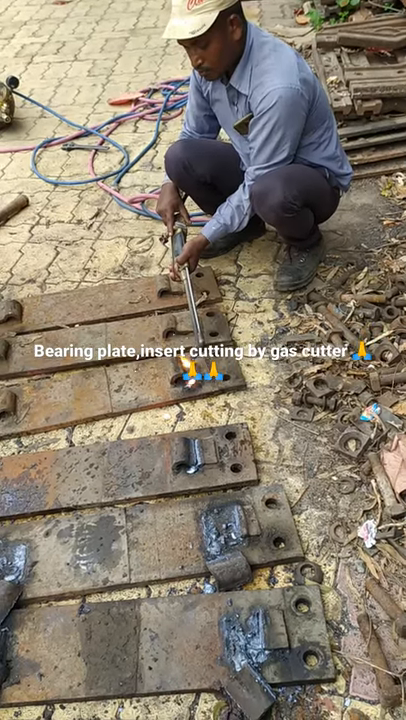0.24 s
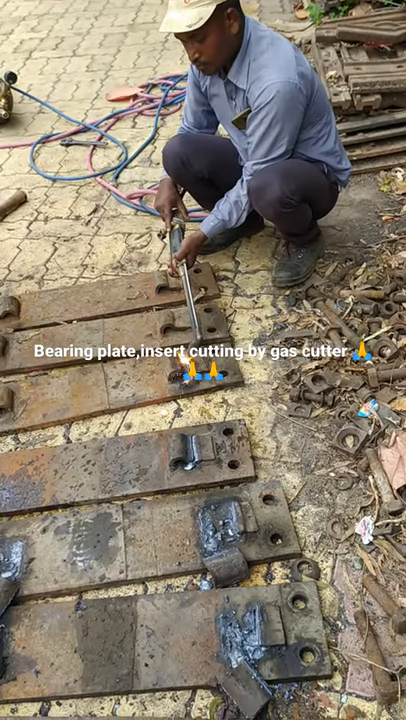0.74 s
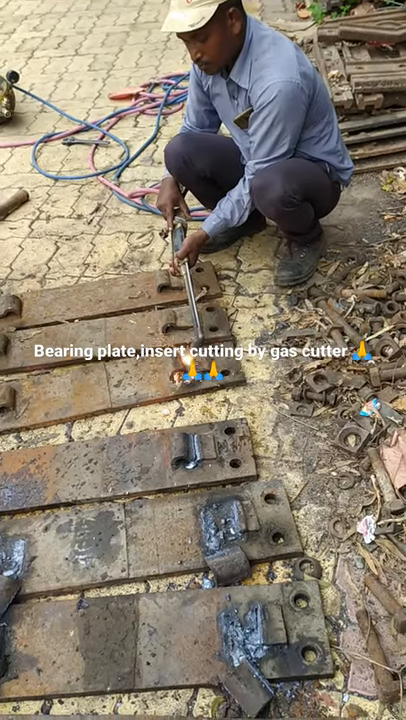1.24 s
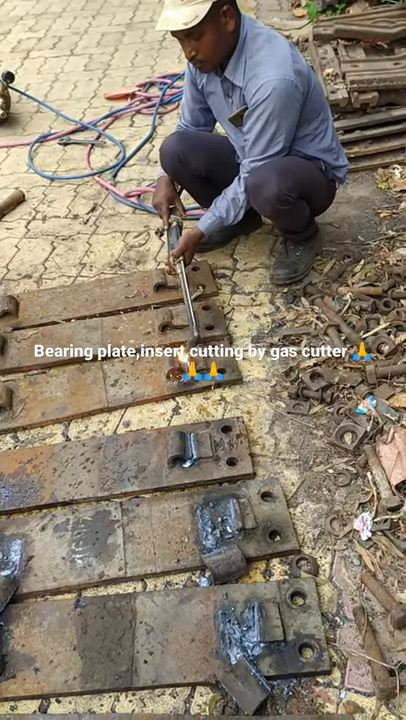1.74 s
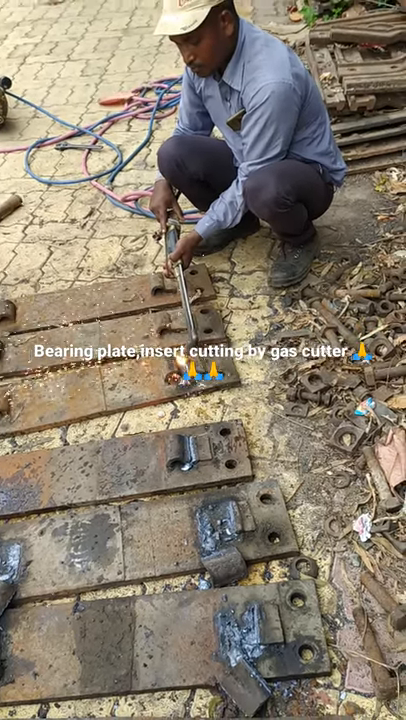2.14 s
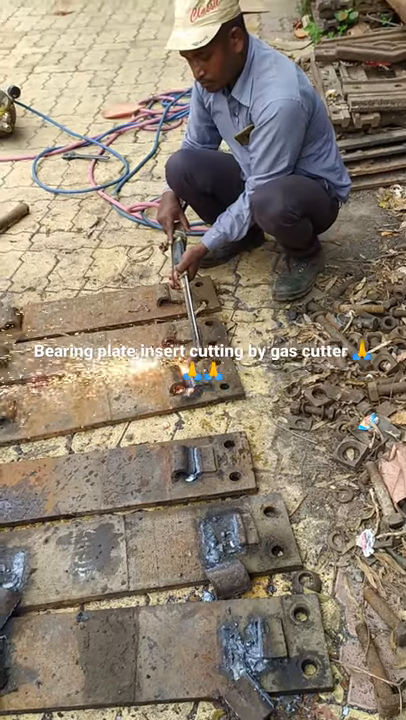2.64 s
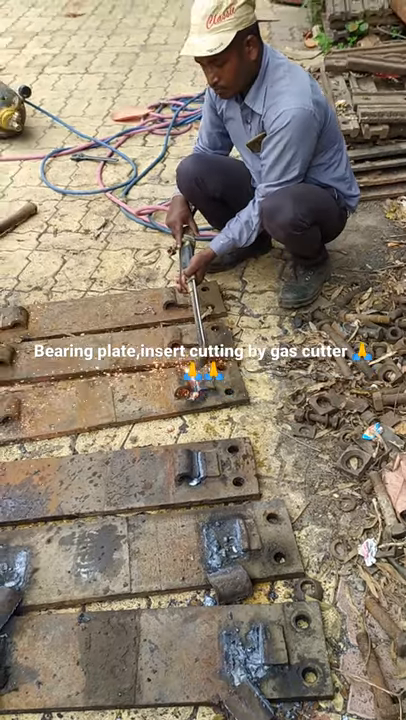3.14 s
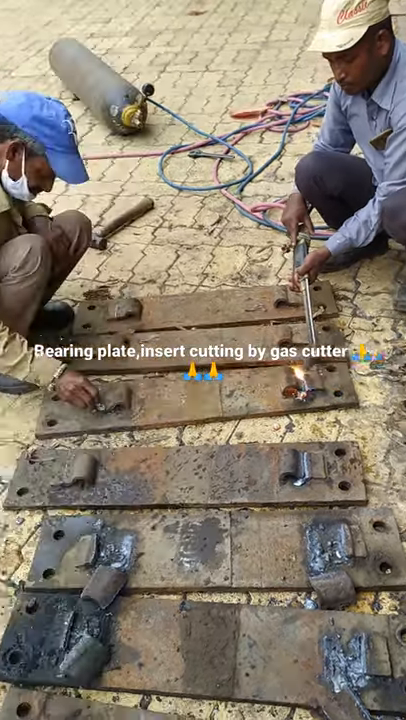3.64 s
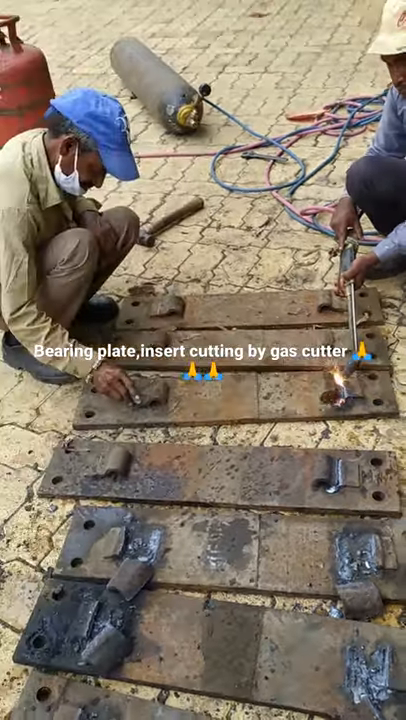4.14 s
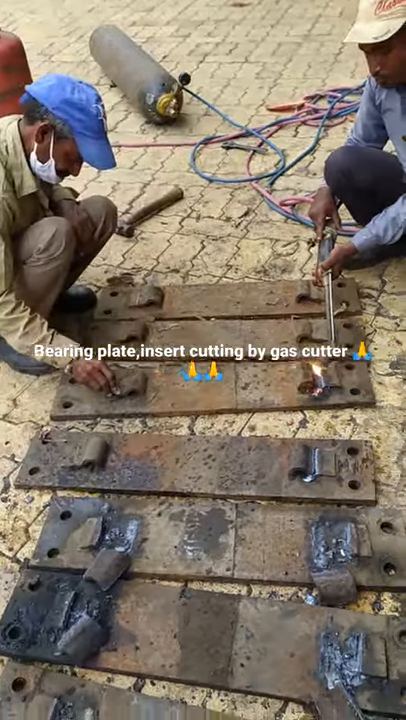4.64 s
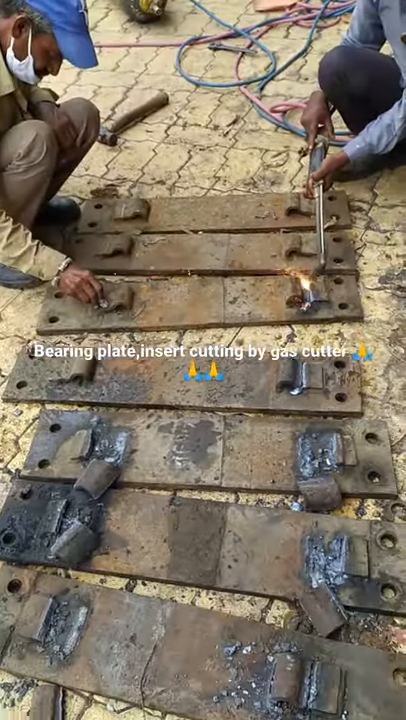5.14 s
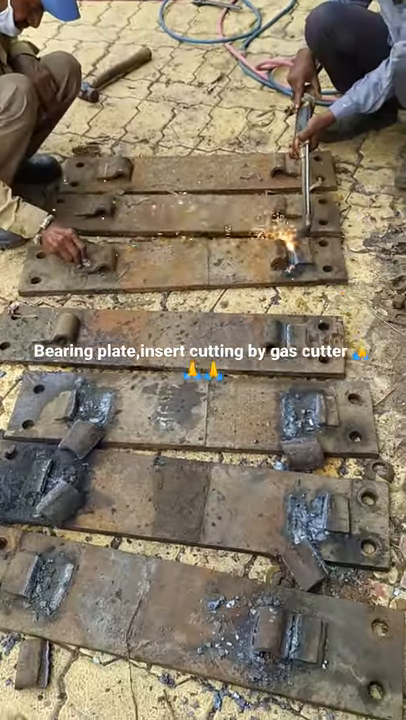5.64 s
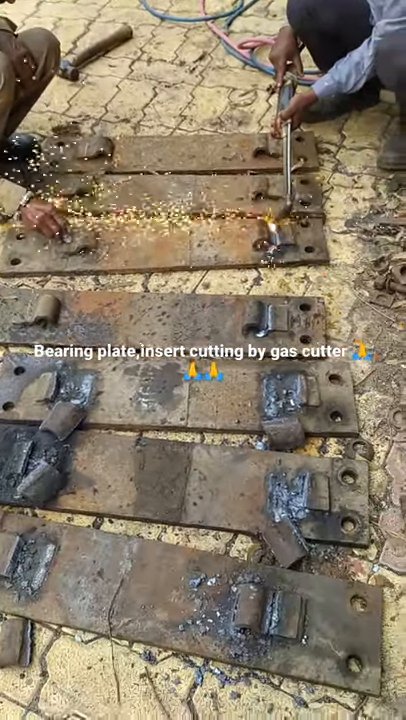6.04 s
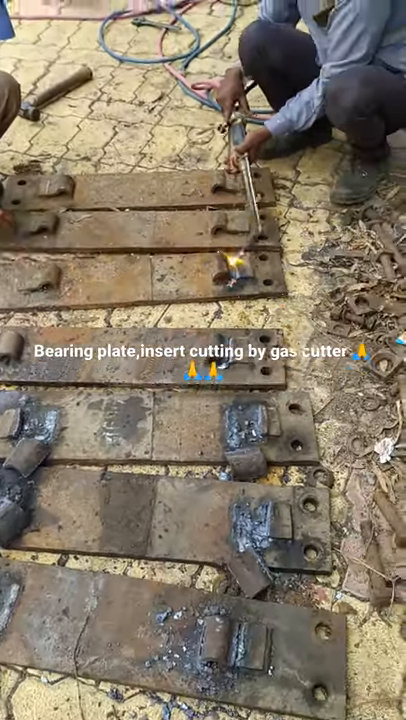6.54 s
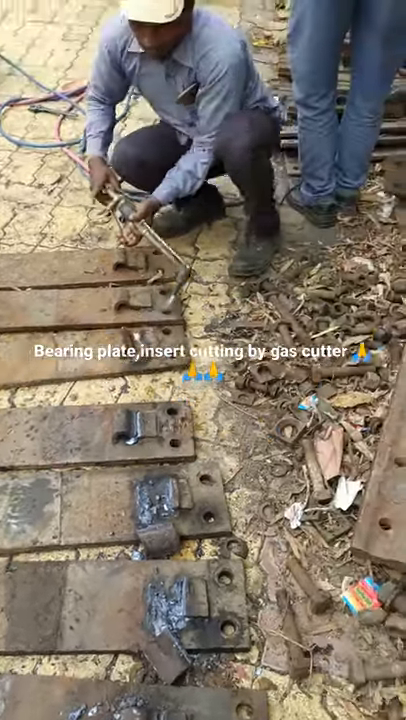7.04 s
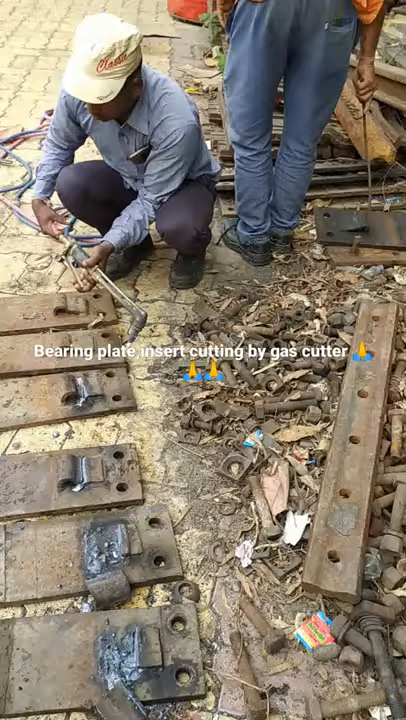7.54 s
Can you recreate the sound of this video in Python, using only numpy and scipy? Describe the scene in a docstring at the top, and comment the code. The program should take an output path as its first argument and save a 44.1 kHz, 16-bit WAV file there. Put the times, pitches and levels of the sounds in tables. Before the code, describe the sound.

A gas cutting torch hisses loudly and steadily over steel plate outdoors, metal clinks once, then the flame pops and sputters as it lifts off.

```python
"""Paving outdoors, where a gas torch cuts a steel plate, heard close by a hand-held pair of microphone ports.
The jet hisses and sizzles in flickering bands of noise, and sets a narrow resonance of the left port ringing.
The flame roars in lower bands, pops in short noise bursts and, lifted off, sputters in a quickening train.
Oxygen rushes out, then drones as noise through the resonances of the slot it blows through. Someone knocks a
piece of steel (ringing modes) and a breeze pushes on the ports (low noise and slow thuds)."""
import sys
import numpy as np
from scipy import signal
from scipy.io import wavfile
from scipy.ndimage import map_coordinates

SR = 44100
rng = np.random.default_rng(int(sys.argv[2]) if len(sys.argv) > 2 else 0)


def store_wav(level_fs):
    """Save 16-bit WAV to argv[1]."""
    pcm = np.round(np.clip(np.atleast_2d(level_fs), -1, 1) * 32767)
    wavfile.write(sys.argv[1], SR, pcm.T.astype(np.int16))


def convert_level_to_amplitude(level_db):
    """Map a level in decibels to its linear amplitude factor."""
    exponent = np.asarray(level_db, float) / 20
    return 10 ** exponent


N = 343980

# lower edge of the treble that the steel echoes and that loses likeness as the hand turns
ECHO_LOW_HZ = 4200


def jet(hiss_db, flutter, focus):
    """Fast gas tears into eddies: broad hiss, a finer sizzle on top, and a narrow ring of the left port that
    the jet excites."""
    # colour of the jet: (time [s], left over right [dB], sizzle over hiss [dB], change of the hiss under 7 kHz
    # [dB], left port's ring over hiss [dB])
    aim = [(0.0, 4, -17, -5, -17), (1.1, 2.5, -8, -0.5, -5.5), (1.5, 4, -13.5, 1, -4.5),
           (2.87, 3, -7.5, 4, -8), (3.45, 2.5, -15, 0, -8), (4.45, 3, -10.5, 0, -9.5),
           (5.52, 4, -24, -8, -26), (6.06, 3.5, -13, -4, -11.5), (6.97, -0.5, -3, 5, -3),
           (7.5, 10, -16, 2.5, -11), (7.8, 7, -10, 7, 0)]
    # relative density of the hiss: (frequency [Hz], level [dB])
    hiss_colour = [(2500, 1), (4000, -4), (5500, -2.5), (6200, -0.5), (8000, 1.5), (10000, -2.5),
                   (11500, -1), (12500, -12)]
    # relative density of the sizzle: (frequency [Hz], level [dB])
    sizzle_colour = [(9000, -29), (10500, 8), (11600, 1), (12300, 3), (14000, -2), (15600, 8), (17000, -8)]
    ring_hz, ring_width_hz, ring_pan_db = 9080, 1100, 16

    pan_db, sizzle_db, breathy_db, ring_db = in_time(aim)
    hiss = ports(turbulence(hiss_colour, 0.43 * flutter, focus, patchy_db=1.16, grain_db=2.5))
    sizzle = ports(turbulence(sizzle_colour, 0.84 * flutter, focus, patchy_db=2.0, grain_db=5.5))
    # the ring of the left port: noise through it partly alike on both ports, plus some of each port's own
    own = np.array([blown(ring_hz, ring_width_hz) for side in "LR"])
    ring = blown(ring_hz, ring_width_hz) + own
    out = tilt(placed(hiss, hiss_db, pan_db), 7000, breathy_db)
    out = out + placed(sizzle, hiss_db + sizzle_db, pan_db)
    return out + placed(ring, hiss_db + ring_db, ring_pan_db)


def roar(roar_db, flutter, focus, begun):
    """Burning eddies rumble, coloured by the gaps between the plates until the torch is lifted off."""
    # relative density of the roar: (frequency [Hz], level [dB])
    roar_colour = [(60, -83), (150, -7), (300, -2.5), (700, 1), (1300, -8), (2000, -1), (3200, -8.5),
                   (4500, 0), (6000, -12), (9000, -9.5)]
    # gaps between the plates: (frequency [Hz], width [Hz], gain [dB])
    on_plate = [(607, 74, -6.5), (942, 160, 6), (1393, 330, 7.5), (2604, 740, 7)]
    # the same with the torch off the plate: (frequency [Hz], width [Hz], gain [dB])
    off_plate = [(670, 175, -13), (1003, 96, 10.5), (1370, 235, 15), (2200, 720, 7.5)]
    # start and end of the lifting: (time [s])
    lift_s = [6.87, 7.38]
    pan_db, dull_idle_db, dull_cut_db = -0.7, -2.5, 2.5

    eddies = turbulence(roar_colour, 0.65 * flutter, focus, patchy_db=0.9, grain_db=4.5)
    lifted = np.interp(np.arange(N) / SR, lift_s, [0, 1])
    out = (1 - lifted) * peaks(eddies, on_plate) + lifted * peaks(eddies, off_plate)
    # fuller under 1.2 kHz once the cut has begun
    dull_db = dull_idle_db + (dull_cut_db - dull_idle_db) * begun
    return tilt(placed(out, roar_db, pan_db), 1190, dull_db)


def pop_rows():
    """Loud pops, the sputter train and stray spits of slag as (time [s], bright level [dB], dull level [dB])."""
    # single loud pops of the flame: (time [s], bright level [dB], dull level [dB])
    loud_pops = [(4.95, -14, -20), (4.992, -13, -20), (5.051, -13, -20), (5.067, -12, -20),
                 (5.084, -12, -20), (5.121, -12, -19), (5.442, -13, -13), (5.4685, -11, -13),
                 (5.982, -14, -21), (6.016, -15, -21), (6.104, -14, -20), (6.193, -15, -21),
                 (6.236, -15, -21), (6.266, -16, -21), (6.32, -16, -19), (6.6096, -14, -5),
                 (6.7075, -12, -19), (6.762, -11, -18), (6.889, -12, -18), (6.9072, -16, -12),
                 (6.972, -14, -19), (7.025, -14, -12), (7.0708, -14, -21), (7.1354, -12, -7),
                 (7.5325, -15, -6), (7.5728, -8, -6), (7.647, -15, -12), (7.692, -18, -11),
                 (7.777, -18, -13)]
    # strength of the sputter: (time [s], bright level [dB], dull level [dB])
    sputter = [(6.63, -19, -22), (6.68, -12, -22), (6.74, -15, -21), (6.85, -20, -19), (7.08, -20, -20)]
    start_s, gap_s, haste_s, count = 6.6324, .0190, .00006, 26
    crackles_per_s, crackle_db, crackle_dull_db = 20, -21, -27

    k = np.arange(count)
    s = start_s + gap_s * k - haste_s * k ** 2  # the gaps shrink
    curve_s, bright_db, dull_db = np.transpose(sputter)
    train = np.c_[s, np.interp(s, curve_s, bright_db), np.interp(s, curve_s, dull_db)]
    chance = rng.random((300, 2))
    when = np.cumsum(-np.log(chance[:, 0])) / crackles_per_s
    # a few crackles are much louder than most, up to a ceiling
    level_db = [crackle_db, crackle_dull_db] - 3.5 * (1 + np.log(chance[:, 1:]))
    stray = np.c_[when, np.minimum(level_db, -16)]
    return np.r_[np.array(loud_pops), train, stray[when < N / SR - .01]]


def pops(bright_s, dull_s, crack):
    """Each pop is a crack and a puff of noise that dies in a few ms, with a bright and a dull part."""
    rows, out = pop_rows(), 0
    at = np.round(rows[:, 0] * SR).astype(int)
    # noise common to both ports, plus some of each port's own
    noise = rng.standard_normal(N) + .5 * rng.standard_normal((2, N))
    for column, low_hz, high_hz, fall_s in ((1, 5900, 10200, bright_s), (2, 900, 4900, dull_s)):
        starts = np.full(N, 1e-18)
        starts[at] = convert_level_to_amplitude(rows[:, column])
        puff = noise * signal.lfilter([1], [1, -np.exp(-1 / (fall_s * SR))], starts)
        band = signal.butter(2, [low_hz, high_hz], "band", fs=SR, output="sos")
        out = out + signal.sosfilt(band, puff + crack * starts)
    return ports(out)


def rush_level():
    """Each press of the oxygen lever starts weak, swells, holds and is shut off fast; level in dB."""
    # presses of the lever: (time [s], length [s], level [dB])
    presses = [(0.981, 0.023, -22), (1.1, 0.14, -13.5)]
    swell_share, start_db, release_s = .4, -12, .006

    t, out = np.arange(N) / SR, np.full(N, 1e-4)
    for s, length_s, db in presses:
        swell_db = start_db * np.clip(1 - ((t - s) / (swell_share * length_s)) ** 2, 0, 1)
        shut = np.exp(-np.maximum(t - s - length_s, 0) / release_s)
        out += (t > s) * convert_level_to_amplitude(db + swell_db) * shut
    return 20 * np.log10(out)


def blast(flutter, focus):
    """The lever lets a rough, dull rush of oxygen through."""
    # relative density of the rush: (frequency [Hz], level [dB])
    blast_colour = [(120, -14.5), (250, 0), (600, -1), (1200, 1.5), (2400, -0.5), (3000, 9), (3500, -12)]
    rush = turbulence(blast_colour, flutter, focus, patchy_db=1.5, grain_db=6.5)
    return placed(rush * convert_level_to_amplitude(3.0 * drift(90)), rush_level(), -1.0)


def cut_progress():
    """The oxygen blows through the slot: a 0-1 rise that stays, and the same dying away at the end."""
    start_s, end_s, fade_in_s, fade_out_s = 0.96, 6.44, 0.5, 0.2
    t = np.arange(N) / SR
    begun = np.clip((t - start_s) / fade_in_s, 0, 1)
    return begun, begun * np.exp(-np.maximum(t - end_s, 0) / fade_out_s)


def drone(cutting):
    """The oxygen stream blows the slot like a bottle."""
    # air in the slot: (frequency [Hz], width [Hz], relative level [dB])
    slot = [(385.2, 60.7, -3), (967, 115, -10)]
    cut_db, idle_db, waver_db = -29.5, -44.5, 1.0
    level_db = idle_db + (cut_db - idle_db) * cutting + waver_db * drift(0.71)
    out = sum(convert_level_to_amplitude(db) * blown(hz, width_hz) for hz, width_hz, db in slot)
    return convert_level_to_amplitude(level_db) * out * convert_level_to_amplitude(np.array([[1.2], [-1.2]]))  # left, right


def knocks():
    """A struck piece of steel rings in dying modes; each knock strikes every mode with its own strength."""
    # the knocks: (time [s], level [dB])
    strikes = [(3.758, -23), (3.763, -18), (3.7668, -19), (3.770, -13), (3.79, -23), (3.813, -18.5),
               (3.827, -19), (3.841, -18), (3.86, -22), (3.880, -19), (3.887, -19), (3.898, -20.5),
               (3.914, -28)]
    # modes of the steel: (frequency [Hz], relative level [dB], time to fall by 60 dB [s])
    steel = [(298, -3, 0.04), (520, -4, 0.02), (776, -5.5, 0.057), (1084, -1.5, 0.04), (1260, -17, 0.15)]
    rows, out = np.array(strikes), np.zeros(N)
    at = np.round(rows[:, 0] * SR).astype(int)
    strength_db = rng.normal(0, 2.4, (len(rows), len(steel)))
    for k, (hz, level_db, t60) in enumerate(steel):
        clicks = np.full(N, 1e-18)
        clicks[at] = convert_level_to_amplitude(rows[:, 1] + level_db + strength_db[:, k])
        r, w = convert_level_to_amplitude(-60 / (t60 * SR)), 2 * np.pi * hz / SR
        out += signal.lfilter([0, np.sin(w)], [1, -2 * r * np.cos(w), r * r], clicks)
    return signal.sosfilt(signal.butter(2, 200, "high", fs=SR, output="sos"), out)


def breeze():
    """Moving air presses on the ports: low noise, partly each port's own, and slow pushes mostly on the left."""
    # swells of the breeze: (time [s], level [dB], width [s])
    gusts = [(1.19, -33, 0.049), (3.6, -54, 0.41), (5.47, -47, 0.083), (6.7, -56, 0.43), (7.57, -51, 0.12)]
    # gusts that push on the ports: (time [s], level on the left [dB], rise [s])
    pushes = [(1.250, -15, 0.035), (5.50, -27, 0.099), (7.58, -17, 0.0032), (7.60, -29, 0.044)]
    calm_db = -52

    t = np.arange(N) / SR
    noise = rng.standard_normal(N) + .9 * rng.standard_normal((2, N))
    low = rms_one(signal.sosfilt(signal.butter(2, [15, 150], "band", fs=SR, output="sos"), noise))
    swell = convert_level_to_amplitude(calm_db) + sum(convert_level_to_amplitude(db) * np.exp(-((t - s) / width_s) ** 2) for s, db, width_s in gusts)
    rumble = swell * dips() * convert_level_to_amplitude(2.0 * drift(4.2)) * low
    push = np.zeros(N)
    for s, db, rise_s in pushes:
        u = np.maximum(t - s, 0) / rise_s
        push -= convert_level_to_amplitude(db) * u * np.exp(1 - u) * np.cos(0.58 * u)
    return rumble * convert_level_to_amplitude(np.array([[2.0], [-2.0]])) + push * convert_level_to_amplitude(np.array([[0.0], [-12]]))


def dips():
    """Gain of the brief drops in level: each falls within 5 ms, holds and creeps back."""
    # the drops: (time [s], depth [dB], hold [s], recovery [s])
    drops = [(1.003, -6, 0.085, 0.02), (1.197, -4.5, 0.032, 0.046), (3.77, -3, .03, 0.14),
             (5.882, -2, 0.026, 0.096), (6.54, -3, 0.034, 0.016), (7.574, -5.5, 0.012, 0.065)]
    t, gain_db = np.arange(N) / SR, 0
    for s, db, hold_s, back_s in drops:
        fall = np.clip((t - s) * 200, 0, 1)
        gain_db = gain_db + db * fall * np.exp(-np.maximum(t - s - hold_s, 0) / back_s)
    return convert_level_to_amplitude(gain_db)


def path(x, lag, echo_ms, echo_share):
    """The steel sends back a treble echo that combs the sound; the nearer port hears all first."""
    # strength of the echo on the left and right port: (level [dB])
    side_db = [-2.5, 1]
    skew_ms, high_hz = .004, 6300
    band = signal.butter(2, [ECHO_LOW_HZ, high_hz], "band", fs=SR, output="sos")
    out = []
    for side, sign, db in zip(x, (1, -1), side_db):
        echo = late(signal.sosfiltfilt(band, side), (echo_ms + sign * skew_ms) * SR / 1000)
        out.append(late(side - convert_level_to_amplitude(db) * echo_share * echo, sign * lag / 2))
    return np.array(out)


def scatter(x):
    """Weaker echoes off the other plates and the paving cut narrow, wandering gaps and ridges in the treble."""
    # the echoes, each swinging in strength and sign: (mean delay [ms], rms level before a limit [dB])
    echoes = [(.68, -13), (1.75, -12), (2.4, -13), (3.3, -13), (4.3, -14)]
    low_hz, high_hz, waver_share = 2600, 8000, .025
    band = signal.sosfiltfilt(signal.butter(2, [low_hz, high_hz], "band", fs=SR, output="sos"), x)
    out, power = x, 1
    for ms, db in echoes:
        lag = ms * (1 + waver_share * drift(1.2)) * SR / 1000
        gain = np.clip(convert_level_to_amplitude(db) * drift(1.5), -.5, .5)
        out = out + gain * np.array([late(side, lag) for side in band])
        power = power + gain ** 2
    # turn the band and its echoes down together by the power that the echoes add
    return out - (1 - power ** -.5) * (out - x + band)


def hollows(x):
    """As the hand moves, hollows and humps in the spectrum fade in and out on each port."""
    # the hollows: (start [s], end [s], frequency [Hz], width [Hz], left gain [dB], right gain [dB])
    spots = [(0.0, .95, 12000, 5000, -1, -6), (1.2, 2.4, 10600, 900, -5, 0),
             (2.45, 3.8, 13000, 1800, -6, -3), (3.85, 4.95, 11000, 4000, 0, -5),
             (4.1, 4.95, 10900, 1000, -5, 0), (5.2, 6.2, 5800, 650, -7, 0), (6.0, 6.25, 7000, 1300, -4, 0),
             (6.62, 6.9, 930, 200, 4, 4), (5.2, 6.25, 9900, 900, -4, 2), (5.2, 5.9, 12600, 1700, -13, -3),
             (5.9, 6.45, 12100, 900, -8, -5), (6.6, 7.8, 11800, 5000, 0, -7),
             (7.08, 7.58, 4200, 330, -16, -14), (2.55, 3.85, 4850, 350, 3, 3),
             (2.4, 6.6, 3100, 300, -4, -4), (3.9, 4.9, 4350, 250, -7, -7)]
    fade_s = .08
    t = np.arange(N) / SR
    for start_s, end_s, hz, width_hz, *gains_db in spots:
        share = np.clip(np.minimum(t - start_s, end_s - t) / fade_s + .5, 0, 1)
        shaped = np.array([peaks(side, [(hz, width_hz, db)]) for side, db in zip(x, gains_db)])
        x = x + share * (shaped - x)
    return x


def left_turn(x):
    """The left port delays its top treble: an all-pass, which leaves the levels alone."""
    hz, width_hz = 12300, 3000
    r = np.exp(-np.pi * width_hz / SR)
    a = [1, -2 * r * np.cos(2 * np.pi * hz / SR), r * r]
    return np.array([signal.lfilter(a[::-1], a, x[0]), x[1]])


def ports(x):
    """Each port has a treble colour of its own; run both ways, so that it adds no lag."""
    # left port, then right port: (frequency [Hz], width [Hz], gain of each of two passes [dB])
    port_modes = [
        [(8740, 5700, 6), (12000, 590, -2)],
        [(7230, 3800, 6.5), (9340, 530, -0.5), (14200, 8700, -8.5)],
    ]
    return np.array([peaks(peaks(side[::-1], modes)[::-1], modes) for side, modes in zip(x, port_modes)])


def turbulence(spectrum, shared_db, focus, patchy_db, grain_db):
    """Third-octave bands, finer in the treble, of lumpy stereo noise; eddies make each flicker, partly together."""
    # how alike the two ports hear, before focus scales the treble: (frequency [Hz], likeness [0-1])
    likeness = [(60, .45), (140, .6), (330, .92), (600, .45), (950, .85), (1800, .5), (2600, .8),
                (3300, .5), (4000, .75), (4600, .75), (5600, .75), (6320, .85), (7100, 1), (7960, .85),
                (9000, .3), (15000, .4)]
    lumps = convert_level_to_amplitude(grain_db * np.minimum(rng.exponential(1, (2, 1, N)), 5))
    white, out = rng.standard_normal((2, 2, N)) * lumps, 0
    low_hz, high_hz = spectrum[0][0], spectrum[-1][0]
    edges = 37 * 2 ** np.r_[np.arange(22) / 3, np.arange(43, 55) / 6]
    edges = edges[(edges > low_hz * .9) & (edges < high_hz * 1.25)]
    for k, (low, high) in enumerate(zip(edges, edges[1:])):
        band = signal.butter(2, [low, high], "band", fs=SR, output="sos")
        mid, side = signal.sosfilt(band, white[k % 2])  # neighbouring bands use different noise
        hz = np.sqrt(low * high)
        alike = np.clip(at_hz(likeness, hz), 0, 1) * (focus if hz > ECHO_LOW_HZ else 1)
        flicker_db = patchy_db * (.5 * drift(7.9) + drift(16.5))
        gain = convert_level_to_amplitude(at_hz(spectrum, hz) + shared_db + flicker_db)
        out = out + gain * (np.sqrt(1 + alike) * mid + np.sqrt(1 - alike) * side * [[1], [-1]])
    return out


def blown(hz, width_hz):
    """Noise twice through one resonance, each pass wider so that both together have about this width."""
    r = np.exp(-np.pi * width_hz * 1.5 / SR)
    b, a = [1, 0, -0.976], [1, -2 * r * np.cos(2 * np.pi * hz / SR), r * r]
    return rms_one(signal.lfilter(b, a, signal.lfilter(b, a, rng.standard_normal(N))))


def peaks(x, modes):
    """A chain of resonant peaks and dips, each (frequency [Hz], width [Hz], gain [dB])."""
    for hz, width_hz, db in modes:
        w, g = 2 * np.pi * hz / SR, convert_level_to_amplitude(db / 2)
        a = np.pi * abs(width_hz) / SR
        top = [1 + a * g, -2 * np.cos(w), 1 - a * g]
        bottom = [1 + a / g, -2 * np.cos(w), 1 - a / g]
        x = signal.lfilter(top, bottom, x)
    return x


def tilt(x, hz, db):
    """Raise or lower what lies below hz."""
    return x + (convert_level_to_amplitude(db) - 1) * signal.sosfilt(signal.butter(2, hz, fs=SR, output="sos"), x)


def placed(x, level_db, pan_db):
    """Even out the two sides, then set the level and left-right balance of a layer."""
    even = x / np.sqrt(np.mean(x ** 2, axis=1, keepdims=True))
    return even * convert_level_to_amplitude(level_db + pan_db / 2 * np.array([[1], [-1]]))


def late(x, samples):
    """Read with a moving delay."""
    return map_coordinates(x, [np.arange(N) - samples], order=4, mode="nearest")


def drift(rate):
    """Slow chance of rms 1: noise smoothed twice at rate (Hz), made at every 40th sample."""
    r = np.exp(-80 * np.pi * rate / SR)
    noise = rng.standard_normal(N // 40 + 2002)
    slow = signal.lfilter([1], [1, -2 * r, r * r], noise)[2000:]  # skip the start-up
    return np.interp(np.arange(N) / 40, np.arange(len(slow)), rms_one(slow))


def rms_one(x):
    """Scale to unit rms."""
    return x / np.sqrt(np.mean(x ** 2) + 1e-20)


def in_time(rows):
    """Columns of a curve table, sample by sample."""
    s, *columns = np.transpose(rows)
    return [np.interp(np.arange(N) / SR, s, column) for column in columns]


def at_hz(points, hz):
    """A spectrum read on a log-frequency axis."""
    point_hz, values = np.transpose(points)
    return np.interp(np.log(hz), np.log(point_hz), values)


def scene():
    """Jet, roar and oxygen rush share one flutter of the gas flow; echoes and the moving hand shape the torch."""
    # the torch, nearer or further and turned about: (time [s], jet hiss [dB], flame roar [dB])
    torch_levels = [(0.0, -15.5, -30.5), (0.26, -16, -29), (0.39, -20.5, -33), (0.52, -19, -28.5),
                    (0.7, -18.5, -29.5), (0.96, -16.5, -27.5), (1.4, -16, -24.5), (2.0, -16, -25.5),
                    (2.38, -17, -25), (2.52, -17.5, -29.5), (3.0, -15, -25.5), (3.74, -16.5, -24.5),
                    (4.43, -20, -27.5), (5.15, -16, -27), (5.3, -14.5, -28.5), (5.55, -14, -25.5),
                    (5.76, -17, -27.5), (5.85, -14.5, -27), (6.0, -17.5, -28.5), (6.42, -20, -27),
                    (6.47, -14.5, -23), (6.53, -15, -26), (6.6, -28.5, -26), (6.95, -25, -23.5),
                    (7.3, -19, -25), (7.8, -22, -24.5)]
    # the hand turns and moves: (time [s], left lag [samples], mean echo delay off the steel [ms],
    # treble likeness [0-1], echo strength [dB])
    hand = [(0, -1.5, 1.07, .88, 0), (.5, -1.5, 1.06, .92, -4), (1.0, -1.6, 1.07, .97, 1),
            (1.55, -1.7, 1.08, .97, 2), (2.4, -1.8, 1.06, .95, 1), (2.6, -3.15, 1.045, 1, -3),
            (3.1, -3.0, 1.035, 1, -2), (3.22, -3.1, 1.12, .9, -1), (3.33, -3.0, 1.035, .95, 1),
            (3.8, -2.9, 1.01, .97, 2), (3.92, -3.5, 1.08, 1, -4), (4.06, -3.6, 1.08, .9, -2),
            (4.15, -4.5, 1.08, .5, 0), (4.85, -3.5, 1.06, .3, 3), (5.0, 1, 1.05, .7, 0),
            (5.3, 2.5, 1.05, .75, 0), (5.75, 2.4, 1.09, 1, -3), (6.0, 2.4, 1.1, 1, -2),
            (6.08, 2.0, 1.1, .95, -3), (6.4, 1.2, 1.24, .5, 2), (6.7, 0, 1.23, .8, -3),
            (7.1, -.7, 1.24, .75, -1), (7.8, -.8, 1.26, .75, -1)]

    hiss_db, roar_db = in_time(torch_levels)
    jet_lag, echo_ms, focus, echo_db = in_time(hand)
    flutter = 0.4 * drift(2.7) + 1.16 * drift(54)
    begun, cutting = cut_progress()
    gas = jet(hiss_db, flutter, focus) * dips()
    flame = roar(roar_db, flutter, focus, begun) * dips() + blast(flutter, focus)
    flame = flame + pops(bright_s=0.0017, dull_s=0.002, crack=8.0)
    # the hands tremble, so the echo wavers in length and strength
    echo_ms = echo_ms + .009 * drift(5)
    echo_share = focus ** 2 * convert_level_to_amplitude(echo_db + 1.2 * drift(3))
    flame_lag = .7 + .65 * jet_lag  # samples; follows the jet's lag in part
    torch = path(gas, jet_lag, echo_ms, echo_share) + path(flame, flame_lag, echo_ms, echo_share)
    torch = left_turn(hollows(scatter(torch)))
    return torch + drone(cutting) + knocks() + breeze()


def low_pass(x):
    """Removes everything above the highest recorded frequency."""
    return signal.sosfilt(signal.butter(12, 16000, fs=SR, output="sos"), x)


def record(dry):
    """Peaks are rounded off and the top above about 16 kHz is cut."""
    rounded = 1.088 * np.tanh(dry / 1.108)
    finished = signal.sosfilt(signal.cheby2(14, 60, 16350, fs=SR, output="sos"), rounded)
    return low_pass(finished)


dry = scene()
out = record(dry)
store_wav(out)
```